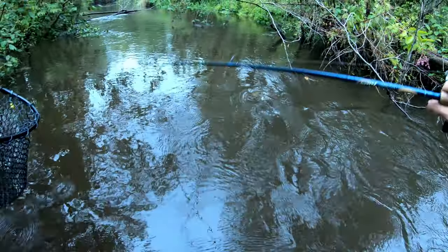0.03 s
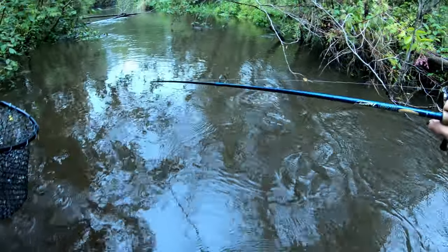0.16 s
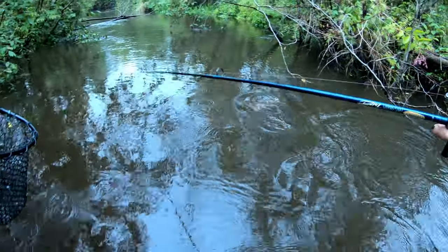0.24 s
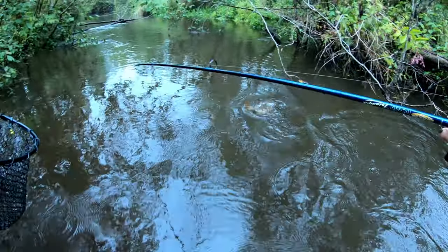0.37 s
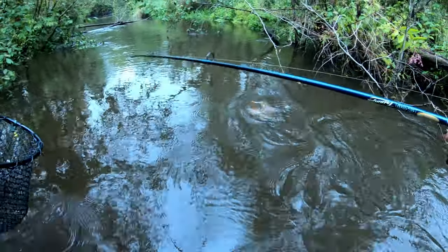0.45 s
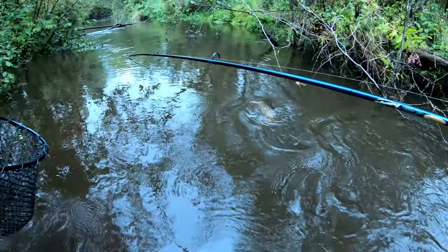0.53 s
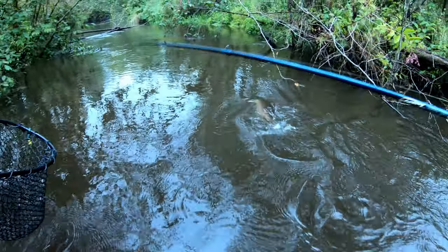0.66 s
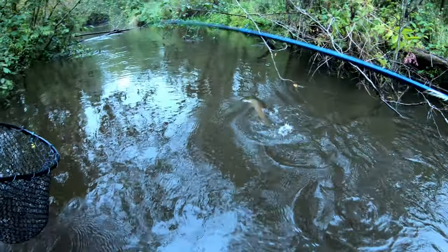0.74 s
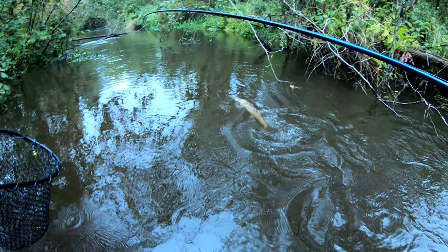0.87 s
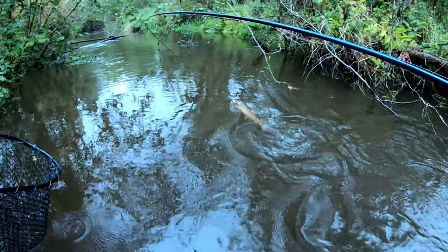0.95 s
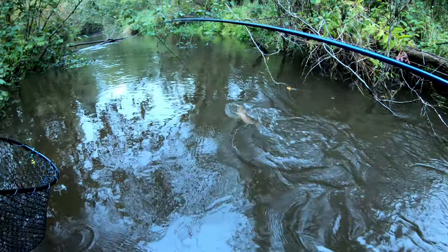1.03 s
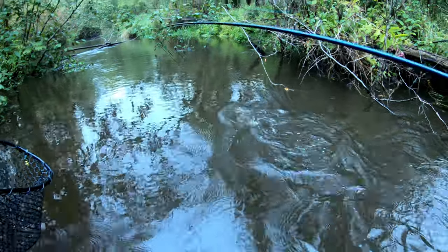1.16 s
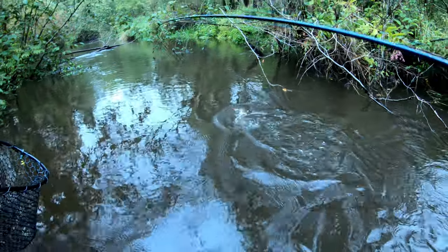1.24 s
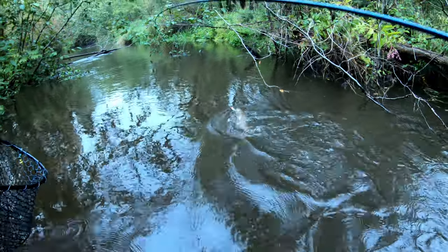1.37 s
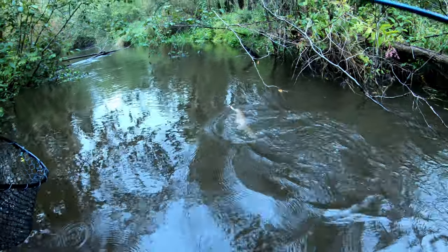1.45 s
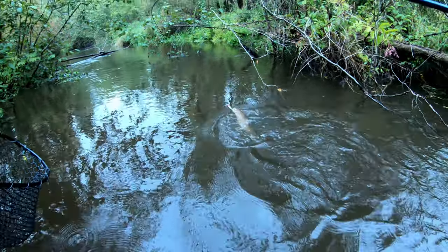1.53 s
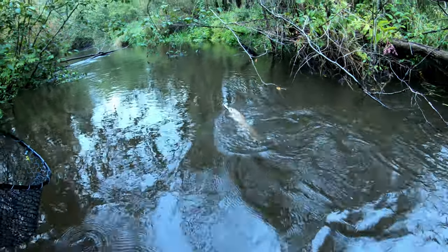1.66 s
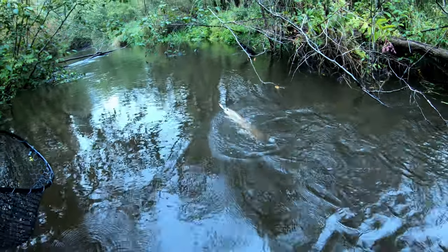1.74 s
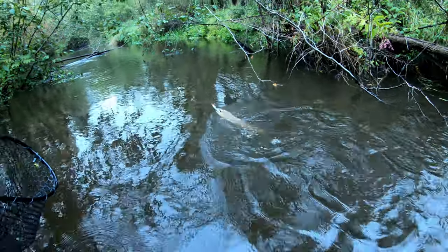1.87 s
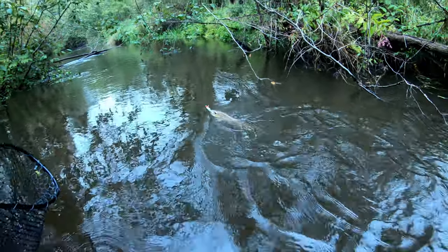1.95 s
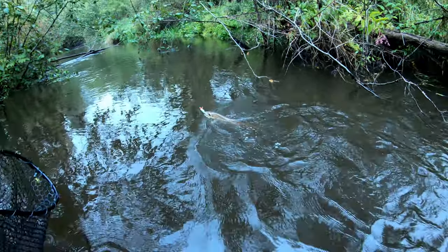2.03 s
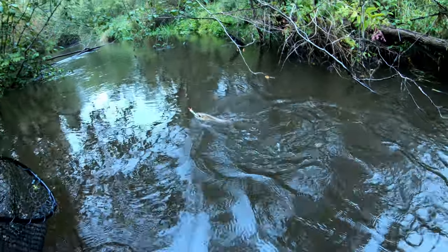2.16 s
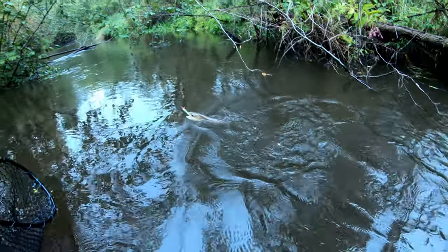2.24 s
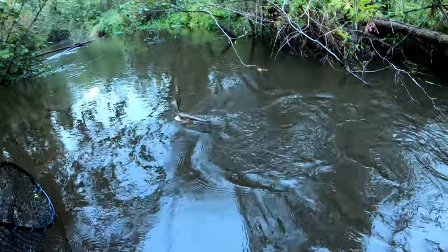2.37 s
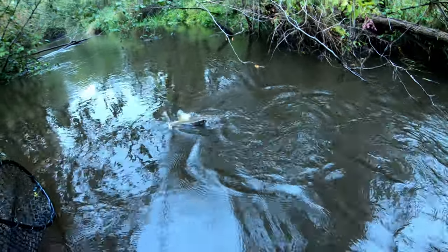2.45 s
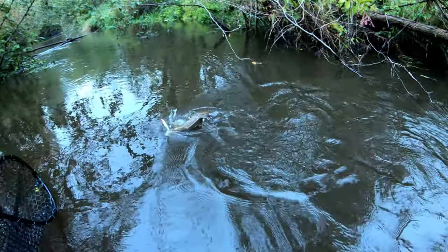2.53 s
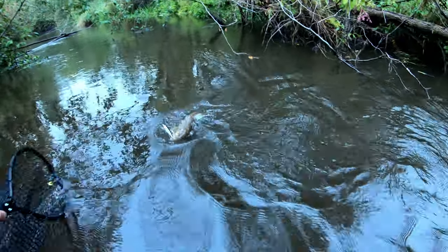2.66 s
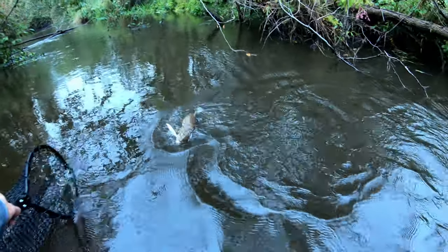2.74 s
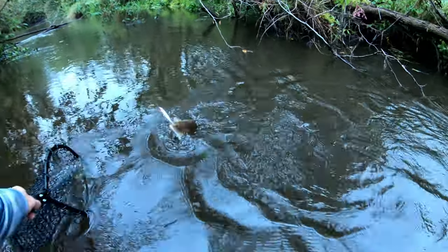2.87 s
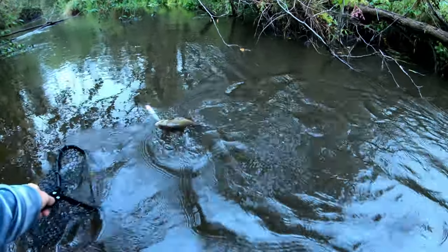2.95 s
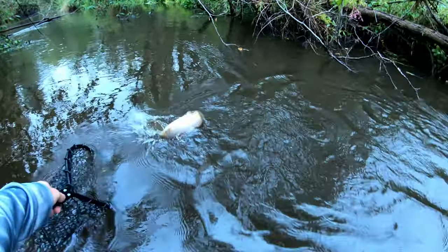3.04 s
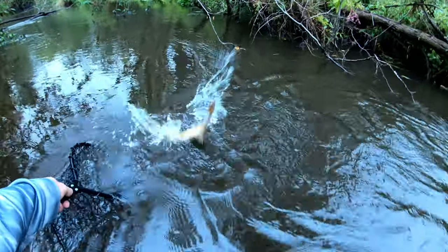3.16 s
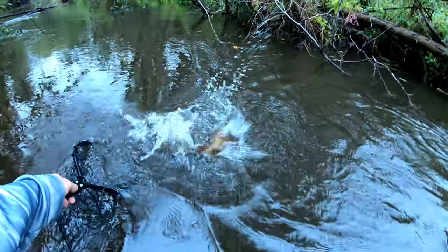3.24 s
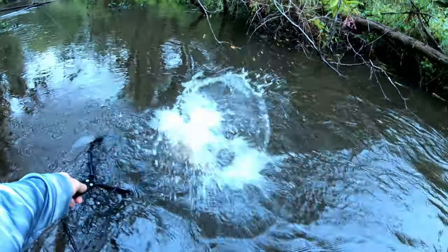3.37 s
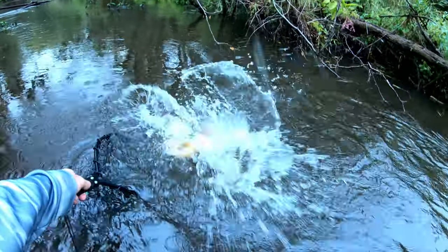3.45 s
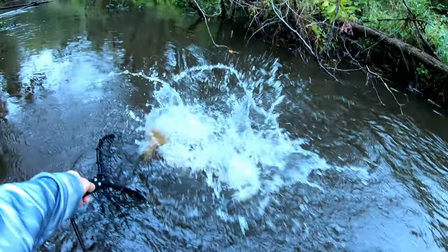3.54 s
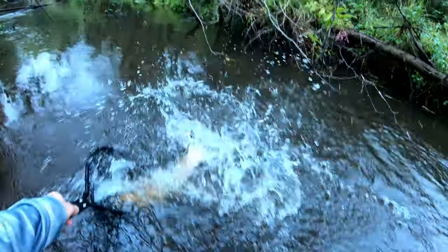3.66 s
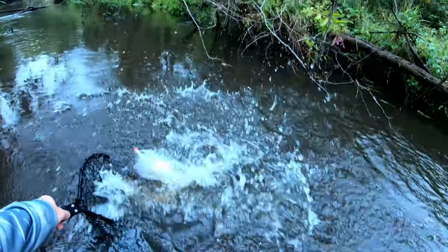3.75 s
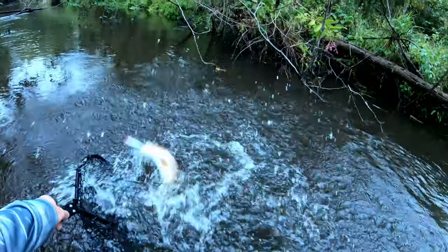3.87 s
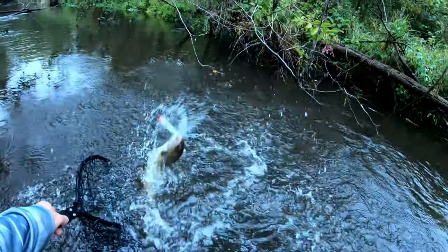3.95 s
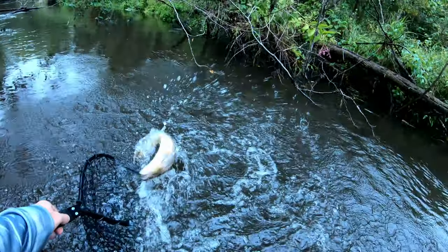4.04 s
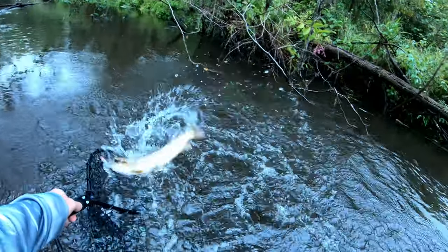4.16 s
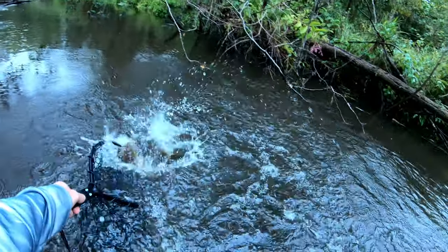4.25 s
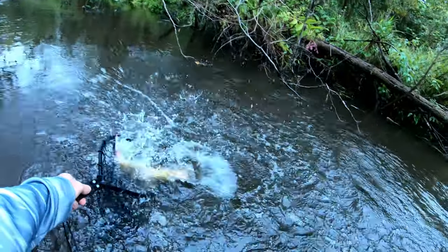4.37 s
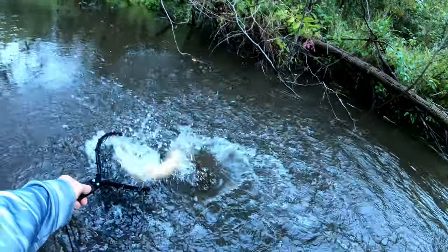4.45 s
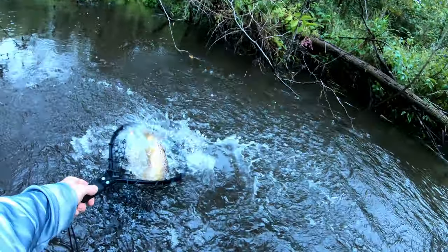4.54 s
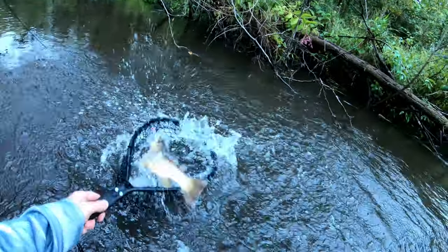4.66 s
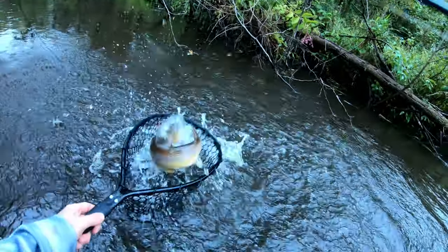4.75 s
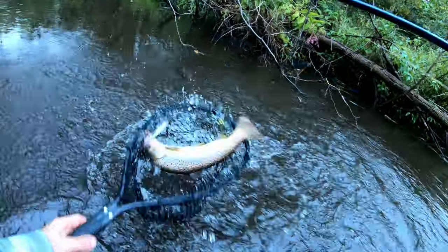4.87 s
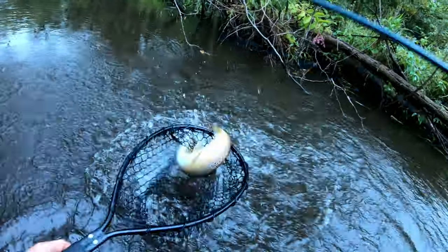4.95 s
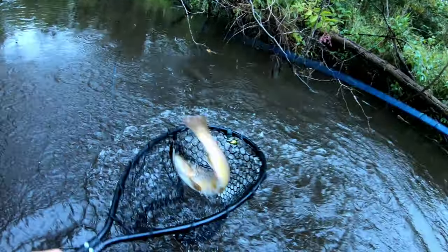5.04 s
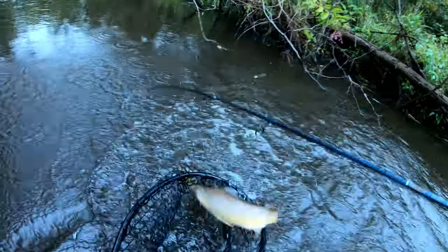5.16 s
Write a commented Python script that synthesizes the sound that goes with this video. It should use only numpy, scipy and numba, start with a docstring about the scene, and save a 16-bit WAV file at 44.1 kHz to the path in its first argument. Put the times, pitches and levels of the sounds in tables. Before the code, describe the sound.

Outdoors at a small creek, heard in stereo from a metre or two. The first three seconds are quiet: faint hiss, a thin insect shimmer around 4.5 kHz, low water wash and a barely audible low drone that fades early. Light drips and ripples lead to a rounded rising gulp and plops at 0.55-0.8 s, then small ticks and drips, with a little cluster near 1.5 s. It is calmest from 1.6 to 2.4 s, then bubbling and plops return at 2.5-2.9 s. At about 3.0 s the fish erupts: crisp wet slaps, dense foam, spray and hollow bubbles, strongest around 3.1-3.7 s. Splashing surges again from 3.85 s, dips briefly near 4.1 s, and beats heavily through 4.2-4.75 s. It thins into falling drops and fizz, then one sharp slap with plops lands at 5.1 s. Soft low thumps bump the camera throughout; the banks add a very short, dull scatter.

```python
"""At a still creek, a hooked trout is drawn toward a net, a metre or two from a small two-port camera.
Ripples, drips and gulps at first; then it thrashes: slaps, flung spray, bursting foam and closing pockets.
Water is built from grains, short gliding sines that swell and die, and its scatter returns from the banks.
Insects sing in the bushes as rapid wing strokes. Shaped noise gives a faint hiss, a low wash and low thumps
on the camera body; a slightly wandering sine gives a far drone."""
import sys
import numpy as np
from scipy import signal
from scipy.fft import rfft, irfft, next_fast_len
from scipy.io import wavfile
from scipy.ndimage import uniform_filter1d
from numba import njit

SR = 44100
rng = np.random.default_rng(int(sys.argv[2]) if len(sys.argv) > 2 else 0)


def wav_out(sig):
    """Save sig, one row per channel (or a flat mono array), as 16-bit PCM at SR to the path in sys.argv[1]."""
    wavfile.write(sys.argv[1], SR, np.round(np.clip(np.atleast_2d(sig).T, -1, 1) * 32767).astype(np.int16))


def attenuation_scalar(level_db):
    """Turn a level in dB into a linear amplitude multiplier (20 dB per decade)."""
    decades = np.asarray(level_db, float) / 20
    return 10 ** decades


N = 229689  # length [samples]


def along(table, hz):
    """Read (frequency [Hz], value) points on a log-frequency axis."""
    point_hz, value = np.transpose(table)
    return np.interp(np.log(np.maximum(hz, 1)), np.log(point_hz), value)


def level_curve(table):
    """Turn (time [s], level [dB]) points into a gain per sample."""
    time_s, level_db = np.transpose(table)
    return attenuation_scalar(np.interp(np.arange(N) / SR, time_s, level_db))


def unit(x):
    """Scale to rms 1."""
    return x / np.sqrt(np.mean(x ** 2))


def colour(x, table):
    """Shape the spectrum by (frequency [Hz], gain [dB]) points."""
    size = next_fast_len(N)
    hz = np.arange(size // 2 + 1) * SR / size
    return irfft(rfft(x, size) * attenuation_scalar(along(table, hz)), size)[..., :N]


def walk(rate_hz):
    """Random levels, each held 1 / rate_hz seconds and slewed into the next; spread near 1."""
    hold = int(SR / rate_hz)
    steps = np.repeat(rng.standard_normal(N // hold + 1), hold)
    return uniform_filter1d(steps, hold // 2)[:N]


@njit
def ring(start, hz, glide, length, left, right, lead, phase):
    """Each grain is a gliding sine that swells fast and dies slowly."""
    out = np.zeros((2, N))
    for k in range(len(hz)):
        p, n = phase[k], int(length[k]) + 2
        for i in range(min(n, N - start[k])):
            swell = np.sin(np.pi * np.sqrt(i / n)) ** 2
            p += 2 * np.pi * hz[k] * 2 ** (glide[k] * i / n) / SR
            out[0, start[k] + i] += left[k] * swell * np.sin(p + lead[k])
            out[1, start[k] + i] += right[k] * swell * np.sin(p)
    return out


# Usual level difference of the two ports, which face apart: (frequency [Hz], left minus right [dB])
PORT_BALANCE = [(170, -1.6), (860, -3.2), (1400, -.7), (2240, 3.7), (3300, .2), (4650, -.6), (5860, -4.5),
                (8300, -4), (9300, 0), (14000, 1)]


def port_balance(hz):
    """The ports face apart, so each pitch has its own level difference [dB, left minus right]."""
    return along(PORT_BALANCE, hz)


# Phase by which the left port leads: (frequency [Hz], lead [radians])
PORT_LEAD = [(170, .1), (520, .2), (860, .75), (1550, .9), (2240, .5), (2600, -.1), (5100, 0), (6500, 1.0),
             (8300, 2.4), (10000, .8), (14000, -.5)]
# Scatter of that lead with the place of the grain: (frequency [Hz], scatter [radians])
PORT_SCATTER = [(200, .2), (520, .25), (900, .4), (1500, .45), (2500, 1.1), (3100, .35), (4100, .12),
                (5000, 1.2), (7000, 1.35), (9000, 1.65)]


def grains(s, hz, glide, length_s, db, pan_db, place):
    """Set grains in time and between the ports; place (spread 1) is where on the pool each one bursts."""
    start = np.clip(s * SR, 0, N - 1).astype(np.int64)
    lead = along(PORT_LEAD, hz) + along(PORT_SCATTER, hz) * place
    phase = 2 * np.pi * rng.random(len(hz))
    left, right = attenuation_scalar(db + pan_db / 2), attenuation_scalar(db - pan_db / 2)
    return ring(start, hz, glide, length_s * SR, left, right, lead, phase)


# Colour of the faint hiss: (frequency [Hz], gain [dB])
HISS_COLOUR = [(200, 20), (450, -3), (830, 8.5), (1300, -20), (1700, -9), (2800, -57), (5300, -9),
               (9000, 0), (11000, -9), (15500, -13)]


def hiss():
    """Faint hiss from all round: independent shaped noise in each port, its level slightly unsteady."""
    noise = unit(colour(rng.standard_normal((2, N)), [(100, -36), *HISS_COLOUR]))
    return attenuation_scalar(-55.5 + 0.26 * walk(5.7)) * noise


# Level of the low wash: (time [s], level [dB])
WASH_LEVEL = [(0, -64), (.29, -47.5), (.6, -60), (1.0, -51), (1.9, -61.5), (2.7, -51), (3.15, -71),
              (3.45, -45.5), (4.3, -68), (5.0, -49.5), (5.21, -55)]


def wash(shared, apart):
    """A low wash of slow water: noise around 155 Hz, partly common to both ports."""
    low_colour = [(60, -13.0), (115, -5.0), (155, 1.5), (210, -4.5), (300, -15.5), (600, -68)]
    return level_curve(WASH_LEVEL) * unit(colour(shared + 0.69 * apart, low_colour))


# Level of the far drone: (time [s], rms level [dB])
DRONE_LEVEL = [(0, -49.5), (.4, -57.5), (.6, -66.5), (1.5, -66.5), (2.1, -66), (2.5, -64.5), (5.21, -66)]


def drone():
    """A faint far drone: a sine whose pitch wanders slightly about 153.7 Hz."""
    phase = 2 * np.pi * np.cumsum(153.7 + 1.5 * walk(5.)) / SR
    return level_curve(DRONE_LEVEL) * np.sqrt(2) * np.sin(phase)


# Low thumps on the camera body: (time [s], level before flutter [dB], bell width [s])
THUMPS = [(0.03, -54, .05), (0.3, -70, 0.067), (0.69, -46, 0.027), (1.336, -50.5, 0.038),
          (1.94, -65, 0.055), (2.45, -63, .05), (2.62, -57, 0.034), (2.705, -58, 0.024), (3.283, -50, .07),
          (3.735, -51, 0.16), (4.15, -55, 0.089), (4.295, -46, 0.067), (4.463, -52, 0.036),
          (4.688, -56, 0.04), (5.125, -40, 0.035)]


def thumps(shared, apart):
    """Low thumps on the camera body: deep noise swells in bell shapes over a faint low floor, and flutters."""
    t = np.arange(N) / SR
    swell = attenuation_scalar(-74)  # faint low floor
    for s, db, width_s in THUMPS:
        swell = swell + attenuation_scalar(db) * np.exp(-((t - s) / width_s) ** 2)
    deep_colour = [(12, -37), (25, -3), (38, -1.5), (70, -10), (120, -15), (400, -73)]
    flutter = attenuation_scalar(3.5 * walk(12.0))
    return swell * flutter * unit(colour(shared + 0.62 * apart, deep_colour))


def background():
    """Hiss, wash, drone and thumps; wash and thumps are shaped from the same pair of noises."""
    shared = rng.standard_normal(N)
    apart = rng.standard_normal(N) * np.array([[1], [-1]])  # opposite sign in the two ports
    return hiss() + wash(shared, apart) + drone() + thumps(shared, apart)


def insects(count=9000):
    """A far chorus in the bushes: short wing strokes near one pitch, from every side."""
    when, side = rng.random((count, 2)).T
    pitch, size = rng.standard_normal((count, 2)).T
    hz = 4560. + 215. * pitch
    strokes = grains(when * N / SR, hz, 0 * hz, 32.0 / hz, 1.5 * size, 0 * hz, 9.9 * (side - .5))
    return attenuation_scalar(-52.5) * unit(strokes)


def banks(x):
    """Bushes and banks send back a short, dull scatter from the same side as the sound."""
    t = np.arange(int(.12 * SR)) / SR
    decay = attenuation_scalar(-60 * t / 0.16) * (t > .003)  # falls at 60 dB per 0.16 s, after a 3 ms gap
    tail = uniform_filter1d(rng.standard_normal(len(t)) * decay, size=3)
    tail = tail / np.sqrt(np.sum(tail ** 2))
    return attenuation_scalar(-17.5) * signal.fftconvolve(x, tail[None], axes=1)[:, :N]


# Ripples and dripping between the beats: (time [s], level [dB])
RIPPLE_LEVEL = [(0, -51.5), (.5, -53.5), (1.0, -53.5), (1.56, -51.5), (1.66, -62), (2.1, -61), (2.2, -54.5),
                (2.6, -48), (2.96, -46), (3.05, -42), (4.0, -32.5), (5.21, -43)]
# Each roll or tail beat throws water:
# (time of crest [s], hold [s], foam level [dB], gulps minus foam [dB], spray minus foam [dB])
BEATS = [(0.01, .02, -49, 3, -22), (0.64, 0.14, -43, -9, -7), (0.911, 0.022, -47, -3, -7),
         (1.156, 0.044, -52.5, -10, -8), (1.27, .03, -52, -9, -6), (1.38, .04, -54.5, 4.5, -2),
         (1.48, 0.034, -52, -0.5, -10), (2.418, .02, -53, -8, 3.5), (2.743, 0.15, -40.5, -3, -8),
         (3.024, 0.029, -43, 3.5, 6), (3.074, 0.023, -32.5, -6, 2), (3.119, 0.024, -29, -9, 0),
         (3.243, 0.048, -26.5, 2, -2), (3.335, 0.041, -27.5, 4.5, 2.5), (3.44, 0.08, -22, -3, -1),
         (3.585, 0.029, -25.5, -0.5, -2.5), (3.672, .11, -25.5, -2, -4), (3.888, 0.049, -24, -13.5, -4),
         (4.104, 0.012, -41.5, 9, 9), (4.209, .14, -26, -2.5, 0.5), (4.465, .11, -24, -4, -1.5),
         (4.616, 0.031, -27.5, -2, -2.5), (4.732, 0.016, -29.5, -6, -0.5), (4.832, 0.032, -28.5, -16, -3),
         (4.958, 0.029, -30.5, -18, 0.5), (5.16, 0.019, -37, 1, 1.5)]


def beats(offset_db, ripple_db, rise, fall):
    """Gain of a layer: every beat rises, holds and falls away [dB/s] over the ripples."""
    t = np.arange(0, N, 32) / SR
    s, hold, foam_db = np.transpose(BEATS)[:3, :, None]
    climb_db = rise * np.maximum(s - t, 0)
    decay_db = fall * np.maximum(t - s - np.abs(hold), 0)
    beat_db = foam_db + offset_db[:, None] - climb_db - decay_db
    ripple_power = level_curve(RIPPLE_LEVEL)[::32] ** 2 * attenuation_scalar(2 * ripple_db)
    power = np.sum(attenuation_scalar(2 * beat_db), axis=0) + ripple_power
    return np.interp(np.arange(N) / SR, t, np.sqrt(power))


def thrown_water():
    """Gains of gulps, foam and spray; gulps rise and fall faster than the rest."""
    gulp_db, spray_db = np.transpose(BEATS)[3:]
    gulp = beats(gulp_db, ripple_db=-6, rise=900., fall=230.)
    foam = beats(0 * gulp_db, ripple_db=0, rise=256, fall=126)
    spray = beats(spray_db, ripple_db=-4.5, rise=256, fall=126)
    return gulp, foam, spray


# One puff of fine mist: (time [s], bell width [s], rise above its usual share [dB])
MIST_PUFF = (1.2, .025, 9.)


def mist_share(spray):
    """Level of mist against spray [dB]: fainter spray is finer, and one puff stands out."""
    usual_db = -4.0 - 0.07 * (20 * np.log10(spray) + 30)
    s, width_s, rise_db = MIST_PUFF
    return usual_db + rise_db * np.exp(-((np.arange(N) / SR - s) / width_s) ** 2)


# Colour of the churned water: (frequency [Hz], gain [dB])
WATER_COLOUR = [(76, -47), (130, -19.5), (228, -8), (453, -3), (601, -5.5), (780, -3), (1340, -0.5),
                (1580, -6.5), (2010, -3.5), (2510, -10), (3680, -11), (9290, -23), (10900, -36.5),
                (14800, -42.5), (16000, -66)]


def water_coloured(x):
    """Give grains the colour of churned water, at rms 1."""
    return unit(colour(x, WATER_COLOUR))


def swarm(count, lo_hz, hi_hz, cycles, glide, spread_db, scatter_db):
    """A random rain of bubbles of all sizes: many faint, few loud, flat in spectrum."""
    when, size, loud = rng.random((count, 3)).T
    lengths, glides, pan, place = rng.standard_normal((count, 4)).T
    hz = lo_hz * (hi_hz / lo_hz) ** size
    turns = cycles * np.exp(0.49 * lengths)
    db = 20 * np.log10(hz) - spread_db * np.log(loud + 0.0062)
    pan_db = port_balance(hz) + scatter_db * pan
    return grains(when * N / SR, hz, glide * (1 + 1.58 * glides), turns / hz, db, pan_db, place)


def spatter(count=320, size=10):
    """Flung drops land at random: each a knot of tiny grains, a few ms long, around its own pitch."""
    when, centre, loud = rng.random((count, 3)).T[:, :, None]
    late, spread, place = np.moveaxis(rng.standard_normal((count, size, 3)), 2, 0)
    centre_hz = 1794.0 * (8800.0 / 1840.0) ** centre
    hz = np.clip(centre_hz * 2 ** (0.46 * spread), 500, 15000).ravel()
    drop_db = (-3.0 * np.log(loud + .02) + 0 * late).ravel()  # one loudness for the whole knot
    start = (when * N / SR + 0.0015 * np.abs(late)).ravel()
    db = drop_db + 20 * np.log10(hz)
    return grains(start, hz, 0 * hz, 4.7 / hz, db, port_balance(hz), place.ravel())


def churn():
    """Pockets gulp, foam bursts, drops fizz, tick, plink and drift as mist, as water is thrown and falls."""
    gulp, foam, spray = thrown_water()
    surge = np.tanh(uniform_filter1d(walk(45.), size=400))  # shared by gulps, foam, fizz and mist
    gulps = swarm(count=2600, lo_hz=117.3, hi_hz=802.0, cycles=7.07, glide=0.23,
                  spread_db=2.0, scatter_db=2.6)
    bursts = swarm(count=10000, lo_hz=799.5, hi_hz=2603.0, cycles=9.7, glide=0.315,
                   spread_db=3.0, scatter_db=7.0)
    fizz = swarm(count=11000, lo_hz=2590.0, hi_hz=5110.0, cycles=10.45, glide=0.228,
                 spread_db=2.0, scatter_db=1.5)
    mist = swarm(count=30000, lo_hz=5396.0, hi_hz=15100.0, cycles=10.4, glide=0.13,
                 spread_db=0.5, scatter_db=5.5)
    ticks = swarm(count=1100, lo_hz=2000., hi_hz=8750.0, cycles=3.2, glide=0.026,
                  spread_db=4.5, scatter_db=19.0)
    plinks = swarm(count=1500, lo_hz=1766.0, hi_hz=9100.0, cycles=8.7, glide=0.13,
                   spread_db=6.5, scatter_db=5.5)
    pockets = gulp * attenuation_scalar(2.7 * surge) * water_coloured(gulps)
    froth = foam * attenuation_scalar(2.0 * surge) * water_coloured(bursts)
    drops = attenuation_scalar(1.96 * surge + 0.23 * walk(130.)) * water_coloured(fizz)
    drops = drops + attenuation_scalar(-14.5) * water_coloured(ticks)
    drops = drops + attenuation_scalar(-11.0) * water_coloured(plinks)
    drops = drops + attenuation_scalar(-9.5) * water_coloured(spatter())
    haze_db = mist_share(spray) + 3.1 * surge + 0.92 * walk(97.0) + 0.8 * walk(13.0)
    haze = attenuation_scalar(haze_db) * water_coloured(mist)
    return pockets + froth + spray * (drops + haze)


# Single bubbles, drops and pockets that stand out:
# (time [s], start frequency [Hz], glide [octaves], length [ms], peak level [dB])
BUBBLES = [(0.002, 1054, -0.06, 29, -41), (0.012, 430, 0.89, 21, -38.5), (0.023, 446, .51, 35, -36.5),
           (0.108, 2310, -0.65, 7.9, -30.5), (0.283, 680, -1.9, 10.6, -37), (0.457, 936, 0.27, 41, -42),
           (0.514, 1050, 0.75, 53, -46), (0.561, 1240, 1.17, 6.5, -22.5), (0.585, 940, .18, 18, -39),
           (0.617, 956, -0.59, 44, -34), (0.634, 312.3, 1.26, 55, -20.5), (0.645, 692, 0.76, 32, -40),
           (0.668, 587, 0.34, 46, -31), (0.677, 820, 1.1, 24, -32.5), (0.69, 3700, -.46, 7.9, -34.5),
           (0.697, 2500, -0.61, 9.5, -33.5), (0.737, 3300, -0.77, 17, -32), (0.758, 922, .09, 30, -36),
           (0.848, 1100, 0.24, 5.7, -37), (0.892, 2280, -0.04, 7, -32.5), (0.914, 1300, 0.24, 5.8, -37),
           (0.972, 3260, -.22, 6.4, -33), (1.028, 3870, -0.45, 5.1, -30.5), (1.088, 2800, -.2, 5.5, -37),
           (1.15, 836, -0.07, 24, -35), (1.172, 2440, -.17, 5.7, -29.5), (1.097, 1290, 0.15, 21, -39.5),
           (1.266, 1410, .78, 14, -36.5), (1.364, 399, -0.46, 42, -36.5), (1.368, 1050, .17, 14, -40),
           (1.391, 370, 0.13, 92, -41.5), (1.482, 624, 2.1, 11.7, -29), (1.49, 667, 1.1, 8.7, -27),
           (1.494, 1780, 0.7, 20, -33.5), (1.506, 1760, -.36, 5.2, -29), (1.508, 940, 1.14, 12.5, -38),
           (1.539, 870, .24, 21, -39), (1.551, 1000, 0.11, 18, -36), (1.568, 840, 0.13, 48, -41),
           (1.863, 777, 1.1, 54, -50.5), (2.32, 1240, .13, 32, -44), (2.459, 755, 1.63, 24, -28),
           (2.502, 259, 1.3, 75, -44.5), (2.536, 1060, 0.12, 17, -28), (2.547, 2270, 1.2, 9.2, -31.5),
           (2.561, 1187, 0.37, 52, -39), (2.672, 536, -.42, 31, -33), (2.681, 1470, -.41, 9.3, -22),
           (2.721, 297, 0.54, 38, -33), (2.8, 3340, 0.059, 6.3, -24), (2.804, 2740, 0.56, 10.5, -24),
           (2.858, 350, 1, 77, -35), (2.964, 946, -0.73, 16.3, -17.5), (3.058, 890, -.7, 35, -24.5),
           (3.086, 3380, 0.56, 2.9, -13), (3.091, 1670, -0.94, 6, -7.5), (3.123, 3960, -0.54, 5.6, -19),
           (3.153, 1170, 0.11, 9.7, -16.5), (3.219, 1110, -1.75, 4.9, -13.5), (3.219, 333, -0.5, 17, -20),
           (3.23, 468, 0.86, 40, -21), (3.26, 1360, 1.73, 6.8, -12), (3.26, 3360, -0.62, 5.7, -11),
           (3.35, 3040, 0.94, 7.9, -8), (3.36, 2930, 0.12, 13, -13), (3.366, 1064, 1.3, 14, -17),
           (3.432, 393, 0.97, 21.5, -18.5), (3.497, 517, -0.71, 55, -18), (3.503, 945, 1.23, 7.4, -6),
           (3.504, 3720, -0.25, 8.2, -13), (3.597, 1000, .36, 9.7, -14.5), (3.62, 1767, -0.026, 14, -16),
           (3.672, 303, -0.077, 15, -19), (3.739, 512, -0.53, 18.5, -17), (3.874, 3190, -.26, 7.9, -14.5),
           (3.909, 1470, 1.2, 24, -20), (3.937, 1240, 0.59, 5.8, -14), (3.944, 766, 0.65, 48, -26),
           (3.972, 1164, 1.06, 11, -15), (3.995, 1240, 1.3, 5, -9), (4.008, 395, -0.075, 33, -23.5),
           (4.02, 1740, .15, 11, -17), (4.06, 396, 0.45, 41, -28.5), (4.115, 594, -0.65, 6.8, -15.5),
           (4.233, 532, -0.77, 53, -21.5), (4.268, 318, 1.8, 57, -23), (4.312, 880, -0.54, 5.9, -11),
           (4.314, 293, -0.47, 16.3, -15), (4.34, 294, 1.33, 29, -19), (4.491, 776, 0.28, 16, -16.5),
           (4.542, 1245, 0.17, 10, -16), (4.549, 1021, -.79, 20, -16), (4.618, 671, 0.66, 50, -21.5),
           (4.642, 220, -0.62, 31, -29), (4.746, 500, 1.3, 10.8, -18), (4.811, 588, 0.72, 55, -28.5),
           (5.105, 442, -0.84, 17, -18), (5.108, 980, 1, 3.8, -13.5), (5.109, 232, -0.52, 11, -17),
           (5.109, 130, -1.1, 12, -35), (5.185, 2750, 0.29, 5.1, -18)]


def bubbles():
    """Pockets and drops that stand out one by one: gliding sines, each with a faint octave along."""
    s, hz, glide, length_ms, db = np.transpose(BUBBLES)
    length_s = length_ms / 1000
    pan_db = 1.1 * port_balance(hz)  # a lone bubble leans further than the usual balance
    main = grains(s, hz, glide, length_s, db, pan_db, 0 * s)
    octave = grains(s, 2 * hz, glide, length_s, db - 23.0, pan_db, 0 * s)
    return main + octave


# Tail slaps and landing sheets of water:
# (time [s], level before grain trim [dB], tilt of the lows [dB], tilt of the highs [dB])
SLAPS = [(0.1, -42, -10, -1), (0.328, -43.5, -17, 9.5), (0.6043, -21.5, -6.5, -13), (0.6878, -22, -17, -10),
         (0.7253, -26, 4.5, 1.5), (0.759, -30, -3, -1), (0.8083, -26, -23, -9), (0.915, -36.5, 0, -1),
         (1.1718, -24, -16, -3.5), (1.261, -28, -7, -8), (1.301, -23, -7, -17), (1.3334, -33, -1, 2.5),
         (1.4, -32, -4, -1), (1.5043, -19.5, -2, -8), (2.146, -40, 6, 10.5), (2.5452, -26.5, 4, -22),
         (2.609, -20.5, -22, -11), (2.6807, -26, 8.5, -6.5), (2.8012, -23, -10, -4), (2.8628, -24, -11, -2),
         (3, -13.5, -27, -7), (3.02, -12, -19, -5), (3.0866, -3.5, -7.5, -22), (3.126, -1.5, -18, -16.5),
         (3.2053, -6, -14, -15), (3.261, -3.5, -2, -7), (3.3506, -1.5, -7, -4), (3.364, -7, -8, 0),
         (3.44, -2.5, -9, -30), (3.8595, -8.5, -5, -15), (3.937, -5.5, -5, -14), (3.9936, -5.5, -5.5, -25),
         (4.0932, -19, -17, -0.5), (4.1106, -10.5, -0.5, -4), (4.1619, -4.5, -13, -19),
         (4.214, -2.5, -6, -22), (4.2725, -3, -24, -30), (4.3365, -2, -18, -22), (4.4043, -2.5, -16, -22),
         (4.5286, -3, -16, -8.5), (4.571, -7, -9, -13), (4.7485, -4, -39, -4.5), (4.849, -14.5, 0.5, -4),
         (5.063, -16.5, -1, -10), (5.1073, -0.5, -6, -7)]


def slaps(count=110):
    """A slap is a cluster of very short grains, thickest at its start, each slap with its own colour."""
    when, size, place = np.moveaxis(rng.random((len(SLAPS), count, 3)), 2, 0)
    hz = 1000. * (14700.0 / 1000.) ** size
    s, db, low_db, high_db = np.transpose(SLAPS)[:, :, None]
    octave = np.log2(hz / 3930.0)
    # the tilts reach full depth about half an octave below and above 3930 Hz
    tilt_db = low_db * np.clip(-octave / 0.53, 0, 1) + high_db * np.clip(octave / 0.58, 0, 1)
    # the slaps grow steeply duller above 8150 Hz
    dull_db = 61.0 * np.maximum(np.log2(hz / 8150.0), 0)
    grain_db = db - 12.5 + tilt_db + 5.7 * octave - dull_db
    start = s - np.log(when + .02) * 0.0015  # grains thin out over 1.5 ms
    hz = hz.ravel()
    spot = np.sqrt(3) * (2 * place.ravel() - 1)
    return grains(start.ravel(), hz, 0 * hz, 4.45 / hz, grain_db.ravel(), port_balance(hz), spot)


def scene():
    """The fish and its water, their scatter from the banks, and the quiet of the creek."""
    water = churn() + bubbles() + slaps()
    return water + banks(water) + insects() + background()


def top_cut(x):
    """Nothing passes above the cut-off."""
    return signal.sosfilt(signal.butter(12, 16500, fs=SR, output="sos"), x)


def record(dry):
    """The very highest peaks are rounded off, bending smoothly toward 0.97 of full scale."""
    rounded = dry / (1 + np.abs(dry / .97) ** 6) ** (1 / 6)
    return top_cut(rounded)


dry = scene()
out = record(dry)
wav_out(out)
```